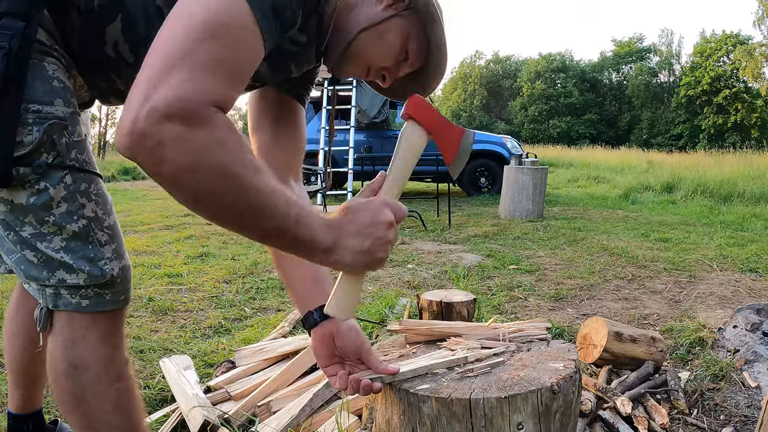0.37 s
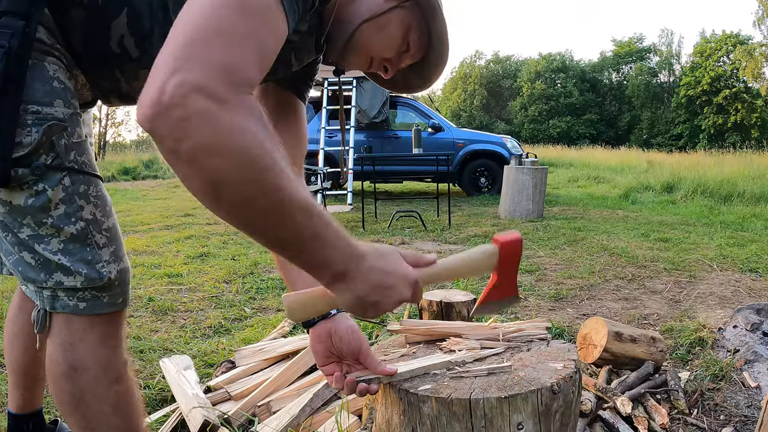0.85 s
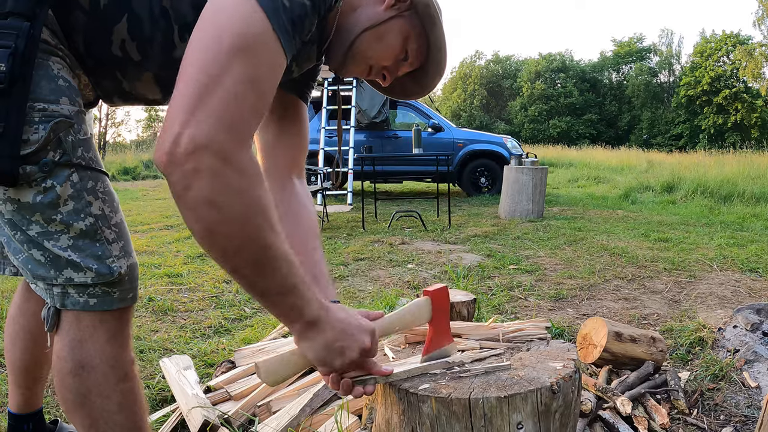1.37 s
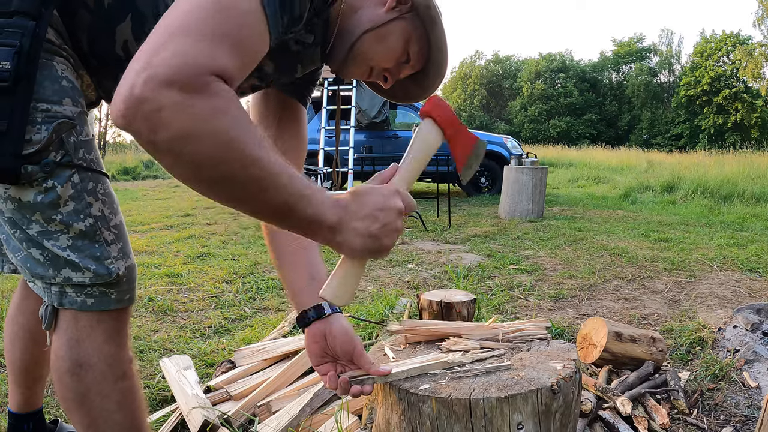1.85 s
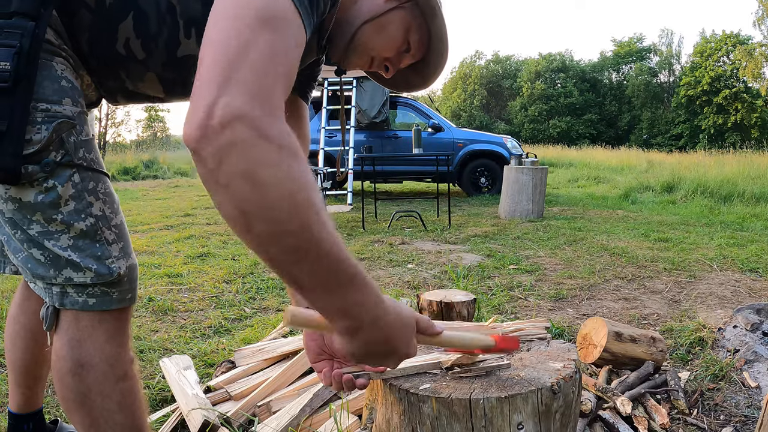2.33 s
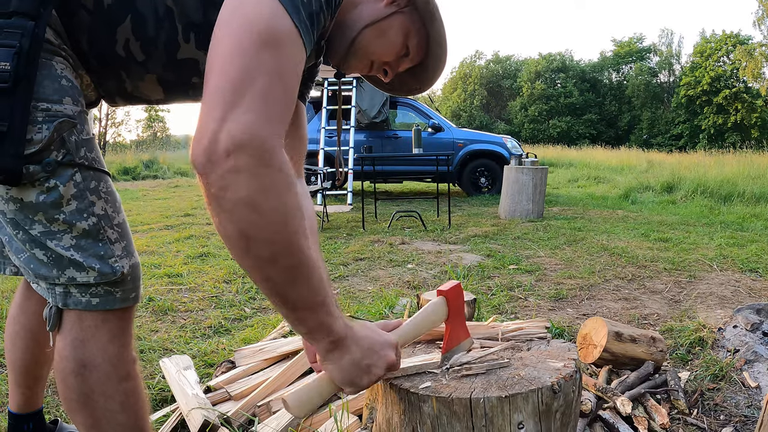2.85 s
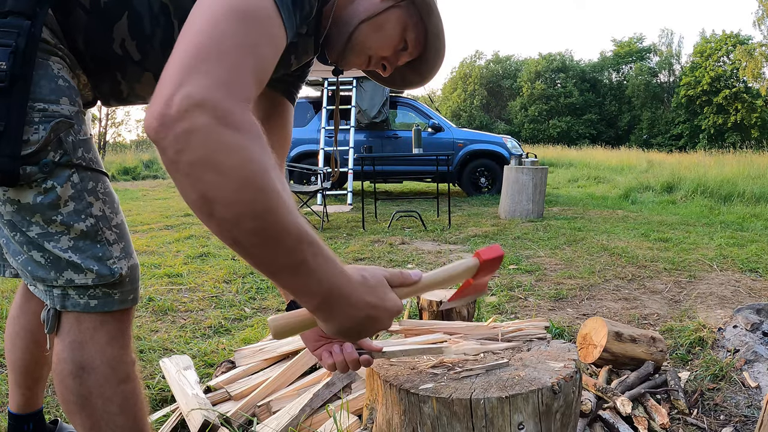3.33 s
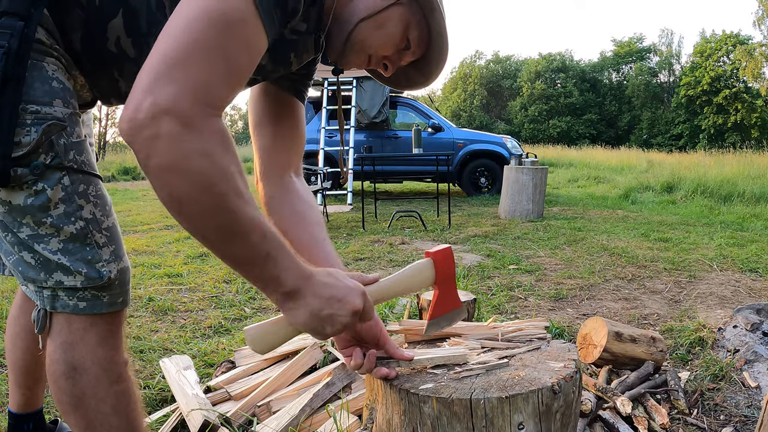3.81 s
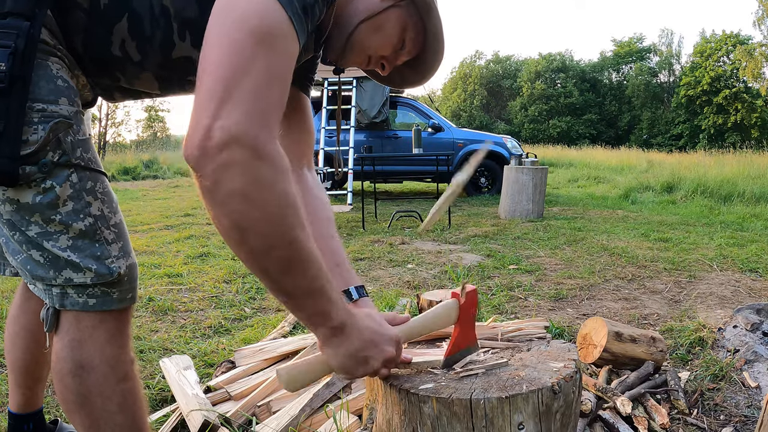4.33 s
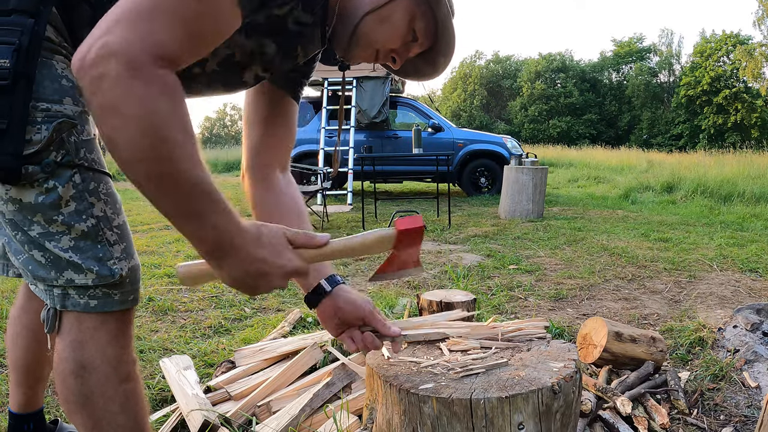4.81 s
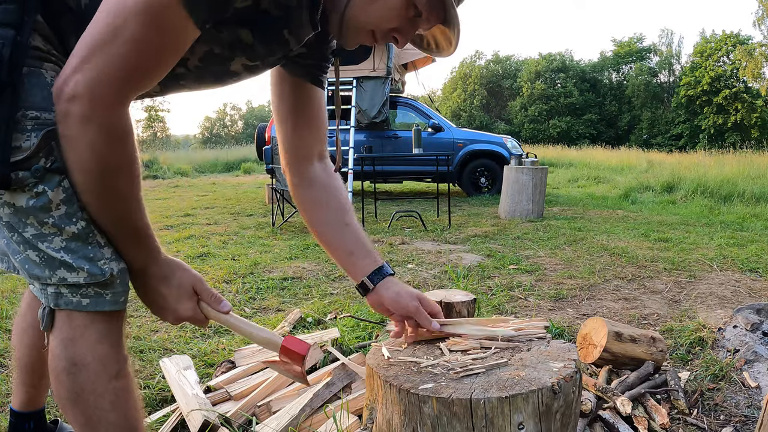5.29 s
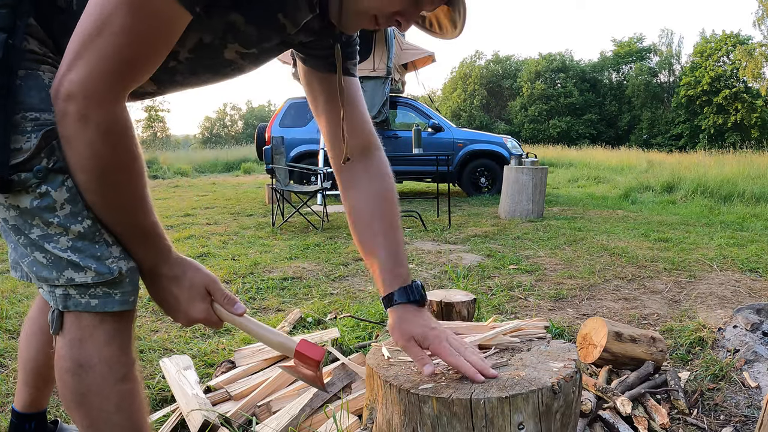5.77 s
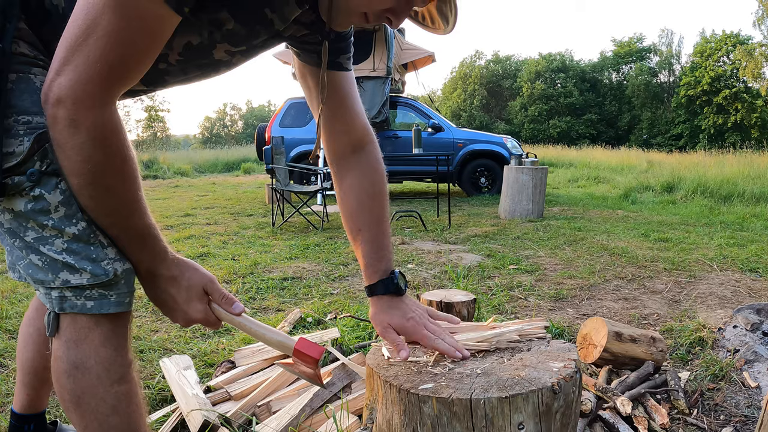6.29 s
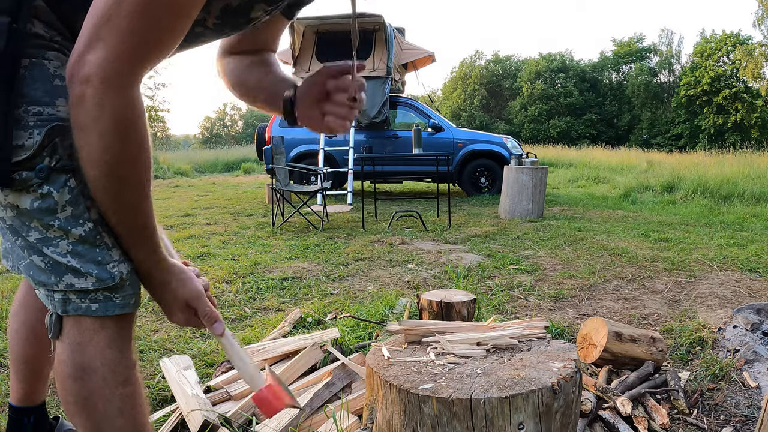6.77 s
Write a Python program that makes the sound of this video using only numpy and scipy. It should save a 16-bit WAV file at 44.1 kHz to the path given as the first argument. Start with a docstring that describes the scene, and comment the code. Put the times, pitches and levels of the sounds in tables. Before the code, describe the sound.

Five close, dry hatchet chops on a wooden block, loose wood clicking between them, followed by soft scraping of chips amid faint birdsong and breeze.

```python
"""A hatchet splits kindling on a stump in a meadow: noise snaps crack, decaying sines ring stump, soil and blade.
Sticks click and thump, grainy noise brushes and sweeps over chips, and short dull repeats trail the blows.
Birds whistle in gliding tones; shaped noise makes far leaves, wind at the microphone and a low late drone.
Two tracks of the same sound are mixed nearly 4 ms apart, which combs all but the dull repeats."""
import sys
import numpy as np
from scipy import signal
from scipy.fft import rfft, irfft, next_fast_len
from scipy.io import wavfile
from scipy.ndimage import uniform_filter1d, map_coordinates

SR = 44100
rng = np.random.default_rng(int(sys.argv[2]) if len(sys.argv) > 2 else 0)


def master_out(mix):
    """Clip the mix to full scale and print it as 16-bit PCM to the path in sys.argv[1]."""
    frames = np.transpose(np.atleast_2d(mix))
    ceiling = np.clip(frames, -1, 1)
    pcm = np.round(ceiling * 32767).astype(np.int16)
    wavfile.write(sys.argv[1], SR, pcm)


def boost_factor(decibels):
    """Convert a level in decibels to a linear amplitude factor."""
    exponent = np.asarray(decibels, float) / 20
    return 10 ** exponent


N = 314874  # length in samples

# Chops: start_s, crack_pitch_hz, stump_level_db, stump_pitch_hz, ground_level_db
CHOPS = [(0.5932, 1320, -15.5, 285, -34.5), (1.317, 1700, -22, 256, -32.5), (2.0994, 1450, -20, 267.6, -33),
         (2.9287, 3500, -19, 268.6, -30), (4.3139, 4000, -20.5, 239, -33.5)]
# Faint short cracks just before a chop: start_s, level_db
FORE_CRACKS = [(0.572, -34), (0.584, -28.5), (1.297, -41.5), (1.306, -30), (2.089, -35), (2.918, -31),
               (4.295, -40), (4.304, -30)]
# The shock of some chops, mainly on the right: start_s, level_db
JOLTS = [(1.317, -14), (2.9282, -18), (4.313, -7.5)]
# The freed blade sings: start_s, level_db, upper_modes_level_db
BLADE_RINGS = [(0.865, -63.5, -2), (1.607, -65, -2), (2.531, -69, -3.5)]
# Ringing modes of the hatchet head: pitch_hz, level_db, time_to_fall_60_db_s
STEEL_MODES = [(5250, -0.5, 1.2), (9815, 5, 0.35), (14180, -5, 0.22)]
# Ringing modes of the stump before they are shifted: pitch_hz, level_db, time_to_fall_60_db_s
STUMP_MODES = [(262.8, 2.5, 0.071), (183.4, 1, 0.077), (349.3, 1, 0.035), (555, -3.5, 0.02),
               (740, -10.5, 0.036), (1256, 0, 0.011)]
# Ringing modes of the soil under the stump: pitch_hz, level_db, time_to_fall_60_db_s
GROUND_MODES = [(34.3, -1.5, 0.2), (59, -4, 0.25), (85, 4.5, 0.13)]
# Tone of splitting fibres: frequency_hz, level_db
SNAP_TONE = [(300, -8.5), (1300, 2), (3400, 4.5), (6000, 0), (11000, 3.5), (15000, -18)]
# Sticks and blade knocking about: start_s, level_db, pitch_hz
CLACKS = [(0.803, -30.5, 3000), (0.863, -34, 5180), (0.894, -30, 5250), (1.007, -38.5, 5340),
          (1.406, -35.5, 3800), (1.555, -20.5, 3370), (1.607, -8, 2840), (1.659, -31.5, 591),
          (2.415, -21.5, 2000), (2.428, -40, 2970), (2.449, -33, 2620), (2.488, -25.5, 1900),
          (3.173, -37, 1840), (3.204, -15, 1990), (3.218, -23, 6500), (3.258, -22.5, 6900),
          (3.311, -36, 2290), (3.395, -33, 2470), (3.557, -35.5, 2270), (3.586, -29.5, 3340),
          (3.784, -32, 3800), (4.467, -40.5, 4550), (4.512, -38.5, 6070), (4.665, -38, 5000),
          (5.016, -43.5, 852), (5.064, -40.5, 2050), (5.445, -30.5, 1510), (5.457, -36, 600),
          (5.4755, -29, 1490), (5.488, -39.5, 628), (5.63, -36.5, 1630), (6.004, -41, 2340),
          (6.028, -34.5, 1730), (6.412, -26.5, 1286)]
# Soft weight landing on the stump: start_s, level_db, stump_pitch_hz
THUMPS = [(0.847, -49, 233), (2.412, -51.5, 262), (2.494, -28, 279), (3.211, -39, 254), (4.612, -42.5, 261)]
# The bare hand sweeps chips off the stump, a duller scrape: centre_s, half_length_s, level_db
SWEEPS = [(5.056, 0.048, -62.5), (5.47, 0.039, -60), (6.003, 0.074, -52.5), (6.415, 0.077, -59),
          (6.691, 0.27, -65), (7.023, 0.11, -55.5)]
# Blade and cloth brush over chips, a bright rustle: centre_s, half_length_s, level_db
BRUSHES = [(0.875, 0.027, -72), (1.515, 0.17, -75.5), (1.648, 0.022, -62.5), (2.42, 0.019, -54),
           (2.49, 0.019, -59.5), (2.65, 0.12, -77.5), (3.188, 0.034, -65), (3.433, 0.16, -76.5),
           (3.732, 0.16, -67.5), (4.005, 0.16, -73.5), (4.561, 0.11, -72)]
# Tone of fine grains of chips: frequency_hz, level_db
FINE_TONE = [(2500, -14), (5000, 1), (10000, 1), (15500, -17.5)]
# Tone of coarse grains of chips: frequency_hz, level_db
COARSE_TONE = [(350, -9.5), (800, -3.5), (1500, -0.5), (3500, -3), (7500, -12.5), (9000, -55)]
# Short dull repeats of the blows, up to 36 ms late: delay_s, level_db
DULL_REPEATS = [(0.017, -35), (0.0267, -19.5), (.036, -12)]
# How long the scattered tail lasts: frequency_hz, time_to_fall_60_db_s
MEADOW_DECAY = [(300, 0.29), (2000, 0.37), (7000, 0.63), (10000, 0.092)]
# Two-voiced bird, both falling: start_s, length_s, lower_first_pitch_hz, upper_first_pitch_hz, level_db
DUETS = [(1.447, 0.092, 6730, 7900, -66), (3.88, 0.16, 7210, 9210, -56), (4.104, 0.1, 6460, 8430, -55),
         (5.568, 0.13, 7330, 8670, -75), (5.757, 0.088, 6440, 7820, -72.5)]
# Calls that flick up, then droop: start_s, droop_length_s, top_pitch_hz, level_db
HOOKS = [(6.478, 0.13, 7550, -60.5), (6.67, 0.074, 7470, -55), (6.828, 0.058, 7330, -55.5)]
# Short rising cheeps: start_s, level_db
CHEEPS = [(.835, -65), (.93, -59.5), (1.13, -59), (3.935, -54), (4.215, -69)]
# Notes that rise and sink again: start_s, length_s, top_pitch_hz, level_db
ARCHES = [(1.738, 0.099, 6770, -69.5), (2.662, 0.13, 2860, -68.5), (3.308, 0.1, 2600, -69),
          (3.447, 0.098, 2820, -65.5), (4.464, 0.15, 5960, -74), (4.679, 0.089, 6040, -73.5)]
# Other whistled notes, straight glides: start_s, length_s, first_pitch_hz, last_pitch_hz, level_db
GLIDES = [(1.781, 0.064, 3990, 4640, -64), (1.923, 0.11, 6060, 6120, -73), (1.96, 0.14, 3040, 3760, -75),
          (2.591, 0.092, 2760, 2100, -68.5), (2.648, 0.073, 4180, 2780, -72),
          (2.819, 0.16, 2920, 3980, -69), (3.392, 0.059, 2540, 2100, -65), (3.46, 0.053, 3300, 3830, -75),
          (3.843, 0.061, 2150, 2800, -68), (3.904, .07, 2800, 2280, -65.5), (3.97, 0.13, 3070, 3720, -72),
          (4.282, 0.036, 7740, 8200, -56), (4.285, 0.018, 5780, 5900, -50.5),
          (4.882, 0.14, 2930, 3820, -73), (5.018, 0.13, 2110, 2080, -70.5), (5.344, 0.075, 1805, 1870, -71),
          (5.73, 0.28, 2620, 3450, -71), (5.818, 0.059, 3200, 3720, -70), (6.138, 0.11, 6480, 4360, -70.5),
          (6.265, 0.17, 2710, 2240, -65), (6.271, 0.046, 2800, 3050, -70), (6.459, 0.041, 5060, 5060, -62),
          (6.46, 0.13, 4000, 4020, -70), (6.519, 0.28, 3105, 3195, -70), (6.835, 0.083, 1636, 1568, -67.5),
          (7.004, 0.11, 3300, 3670, -58.5), (7.074, 0.058, 1567, 1530, -62)]
# The two pips in each beat of the twitter: delay_s, first_pitch_hz, last_pitch_hz, length_s, level_db
TWITTER_PIPS = [(0, 5220, 5000, 0.017, -58.5), (0.011, 3934, 2994, 0.0209, -57.5)]
# Strength of the wind at the microphone: time_s, level_db
WIND = [(0, -55.5), (.24, -53.5), (.28, -62), (.8, -69), (1.7, -73), (2.3, -66), (3.4, -72.5), (3.8, -66),
        (4.7, -77), (5.5, -60.5), (5.7, -68.5), (6.78, -67), (7.14, -62.5)]
# Tone of the low wind buffeting: frequency_hz, level_db
BUFFET_TONE = [(18, -12.5), (38, -1), (70, 3.5), (110, -13), (140, -24.5)]
# Tone of the higher wind flutter: frequency_hz, level_db
FLUTTER_TONE = [(110, 4.5), (170, 7), (230, 4), (320, -7), (450, -19.5), (700, -9)]
# Tone of the far leaves: frequency_hz, level_db
LEAVES_TONE = [(210, -31.5), (350, 0), (653, -12.5), (1040, 1.5), (1680, -3.5), (2100, -3.5), (2750, -5.5),
               (7080, -12.5), (8310, -17.5), (12400, -26), (15800, -39.5)]
# Tone of the low late drone: frequency_hz, level_db
DRONE_TONE = [(25, -9), (50, -12), (70, 1), (90, -1), (130, -31)]


def hatchet():
    """Each chop cracks the stick, rings the stump and thuds into the soil; the freed blade sings."""
    out = np.zeros((2, N))
    t = np.arange(2048) / SR
    for start, crack_hz, stump_db, stump_hz, ground_db in CHOPS:
        snap = crack(crack_hz, hold=0.002, t60=0.0041, body_db=-8.0, top_hz=15020, chirp=0.00057)
        add(out, start, boost_factor(-10.5) * snap)  # every chop cracks about as loud
        wood = ring(stump(stump_hz), rise=0.0055, spread_db=2.5)
        add(out, start, -boost_factor(stump_db) * wood * boost_factor([[-1.5], [1.5]]))  # stronger on the right
        add(out, start, boost_factor(ground_db) * ring(GROUND_MODES, rise=0.0036, spread_db=3.0))
    # the shock climbs the tripod
    jolt = np.sin(2 * np.pi * 120 * t) * (t / 0.002) * np.exp(1 - t / 0.0014)
    for start, db in JOLTS:
        add(out, start, boost_factor(db) * jolt * [[-0.15], [0.85]])
    for start, db in FORE_CRACKS:
        fore_crack = crack(2300, hold=0.0012, t60=0.026, body_db=-7.5, top_hz=4000, chirp=0.0011)
        add(out, start, boost_factor(db) * fore_crack)
    for start, db, upper_db in BLADE_RINGS:
        lowest = ring(STEEL_MODES[:1], rise=0.0022, spread_db=4.0)
        upper = ring(STEEL_MODES[1:], rise=0.0011, spread_db=3)
        add(out, start, boost_factor(db) * (lowest + boost_factor(upper_db) * upper))
    return out


def crack(hz, hold, t60, body_db, top_hz, chirp):
    """A snap of fibres, a splintering tail and a woody knock at hz and a little above; peak 1.
    Treble comes later, by chirp seconds for each e-fold of frequency."""
    t = np.arange(2048) / SR

    def fade(length):
        return boost_factor(-60 * np.maximum(t - hold, 0) / length) * np.minimum(t / 0.00019, 1)

    def fibres(f):
        return boost_factor(along(SNAP_TONE, f)) / (1 + (f / top_hz) ** 3)

    def delay_treble(f):
        return np.exp(-2j * np.pi * chirp * f * (np.log(f / 1100 + 1e-9) - 1))

    snap, splinter = rng.standard_normal(size=(2, 2, 2048))
    noise = snap * fade(t60) + boost_factor(-8.5) * splinter * fade(3.7 * t60)
    sound = pair(filtered(noise, fibres), side_db=-8.5)
    turns = 2 * np.pi * hz * t
    two_tones = np.sin(turns) + 0.5 * np.sin((1.1 + 0.3 * rng.random()) * turns)
    knock = np.exp(-0.04 * turns) * np.minimum(t / 0.0005, 1) * two_tones
    sound = sound / np.abs(sound).max() + boost_factor(body_db) * knock
    sound = filtered(np.pad(sound, ((0, 0), (64, 0))), delay_treble)[:, 40:]
    return sound / np.abs(sound).max()


def ring(modes, rise, spread_db):
    """Struck modes are decaying sines at new strengths each blow, cut off after half a second."""
    t = np.arange(SR // 2) / SR
    tones = 0
    for hz, db, t60 in modes:
        strength = db + rng.normal(0, spread_db)
        tones = tones + boost_factor(strength - 60 * t / t60) * np.sin(2 * np.pi * hz * t)
    return tones * (1 - np.exp(-(t / rise) ** 2))


def stump(hz):
    """The spot struck and the load set the stump's pitch: its modes shift so that the main one lies at hz."""
    return [(mode_hz * hz / STUMP_MODES[0][0], db, t60) for mode_hz, db, t60 in STUMP_MODES]


def sticks():
    """Light wood gives short clicks; a soft landing only thumps the stump."""
    out = np.zeros((2, N))
    for start, db, hz in CLACKS:
        woody_db, edge_hz = 17000 / (hz + 400) - 11, 3 * hz + 3500  # low knocks ring fuller and duller
        click = crack(hz, hold=0.0015, t60=0.0079, body_db=woody_db, top_hz=edge_hz, chirp=0.00047)
        add(out, start, boost_factor(db - 7.5) * click)
    for start, db, hz in THUMPS:
        add(out, start, boost_factor(db) * ring(stump(hz), rise=0.0018, spread_db=3.5))
    return out


def chips():
    """Each sweep of the hand knocks eight chips at random moments, as small woody cracks."""
    out = np.zeros((2, N))
    for centre, half, db in SWEEPS:
        for at, high, soft in rng.random(size=(8, 3)):
            hz = 1100 * 3 ** high
            tick = crack(hz, hold=0.0006, t60=0.0094, body_db=22, top_hz=5000, chirp=0)
            add(out, centre + half * 1.8 * (at - 0.5), boost_factor(db - 1 - 7.5 * soft) * tick)
    return out


def rustle():
    """Each stroke swells and fades as dense, clumped grains of dry chips."""
    t = np.arange(N) / SR

    def strokes(rows):
        return sum(boost_factor(db) * np.exp(-((t - centre) / half) ** 2) for centre, half, db in rows)

    def grains(depth_db):
        return rng.standard_normal((2, N)) * boost_factor(depth_db * wobble(500) + 1.4 * wobble(60))

    brush, sweep = strokes(BRUSHES), strokes(SWEEPS)
    fine_gain = boost_factor(5) * brush + boost_factor(-14) * sweep  # the hand raises few fine grains
    fine = fine_gain * pair(coloured(grains(4.6), FINE_TONE), side_db=-10.5)
    coarse = (brush + sweep) * pair(coloured(grains(3.8), COARSE_TONE), side_db=-45)
    return fine + coarse


def dull_repeats(x):
    """Short repeats are delayed copies, cut above 8 kHz and thin in the bass."""
    def taps(f):
        return sum(boost_factor(db) * np.exp(-2j * np.pi * f * delay) for delay, db in DULL_REPEATS)

    return filtered(x, lambda f: taps(f) * f / (f + 900) / (1 + (f / 7800) ** 24))


def birds():
    """Near calls of five kinds, each from its own side, an even twitter, and a faint far chorus."""
    out = np.zeros((2, N))

    def side():
        return boost_factor(rng.normal(0, 3.7) * np.array([[1], [-1]]))

    # notes: start_s, length_s, first_hz, middle_hz, last_hz, level_db
    notes = [(start, length, first, (first + last) / 2, last, db) for start, length, first, last, db in GLIDES]
    notes += [(start, length, 0.94 * top, top, 0.92 * top, db) for start, length, top, db in ARCHES]
    notes += [(start, 0.01, 3330, 3800, 4050, db) for start, db in CHEEPS]
    for start, length, low_hz, high_hz, db in DUETS:
        end = 1 - 1.4 * length  # share of the pitch left at the end
        sag = 0.972 ** (length / 0.15) ** 2  # long calls dip further below a straight fall
        for hz, level in ((low_hz, db), (high_hz, db - 2.5)):
            notes.append((start, length, hz, sag * hz * (1 + end) / 2, end * hz, level))
    flick_s = 0.022
    for start, length, top, db in HOOKS:
        notes.append((start, flick_s, 2100, 0.93 * top, top, db - 7))
        notes.append((start + flick_s, length, top, 0.985 * top, 0.91 * top, db))
    for start, length, first, middle, last, db in notes:
        add(out, start, boost_factor(db + 2.5) * whistle(length, first, middle, last) * side())

    for beat in 6.617 + 0.0632 * np.arange(7):  # start and spacing in seconds, seven beats
        for delay, first, last, length, db in TWITTER_PIPS:
            add(out, beat + delay, boost_factor(db) * whistle(length, first, (first + last) / 2, last))

    for at, high, long, rise, fall, loud in rng.random(size=(150, 6)):
        hz = 2000 * 2.2 ** high
        note = whistle(0.022 + 0.1 * long, hz, hz * (1.1 + 0.2 * rise), hz * (0.72 + 0.22 * fall))
        add(out, at * N / SR, boost_factor(-84 + 4 * loud) * note * side())
    return out


def whistle(length, first_hz, mid_hz, last_hz):
    """A gliding, slightly hoarse note: a sine of wavering phase and level with a weak octave."""
    u = np.linspace(0, 1, max(round(length * SR), 64))
    # a curve through the first, middle and last pitch
    hz = first_hz * (1 - u) * (1 - 2 * u) + 4 * mid_hz * u * (1 - u) + last_hz * u * (2 * u - 1)
    hoarseness = 0.5 * map_coordinates(rng.standard_normal(size=200), [u * length * 300])
    phase = 2 * np.pi * np.cumsum(hz) / SR + hoarseness
    swell = np.minimum(np.minimum(u, 1 - u) * length / 0.01, 1)
    swell = swell * boost_factor(3.5 * map_coordinates(rng.standard_normal(size=40), [u * length * 45]))
    return swell * (np.sin(phase) + boost_factor(-35.0) * np.sin(2 * phase))


def meadow(x):
    """A thin tail scattered by trees builds up as the far ones answer; each pitch dies at its own speed."""
    hz, t, z = signal.stft(rng.standard_normal((2, SR // 2)), SR, nperseg=256)
    t60 = np.interp(hz, *np.transpose(MEADOW_DECAY))[:, None]
    shape = boost_factor(-60 * t / t60) * np.minimum(t / 0.032, 1)
    tail = signal.istft(z * shape, SR, nperseg=256)[1]
    tail = tail / np.linalg.norm(tail[0])
    return pair(signal.fftconvolve(x, tail, axes=1)[:, :N], side_db=-3.0)


def air():
    """Shaped noise: leaves hiss in patches, wind buffets and flutters in lumps, a low drone swells late."""
    wind_db, = curves(WIND)
    t = np.arange(N) / SR

    def noise(spectrum):
        return coloured(rng.standard_normal((2, N)), spectrum)

    gust_db, lump_db, breath_db = 2.2 * wobble(7), 2.2 * wobble(12), 1.2 * wobble(3)
    leaves_db = -69.5 + breath_db - 3.1 * (t < 0.24)  # softer at the very start
    leaves = boost_factor(leaves_db) * pair(coloured(patchy(depth_db=1), LEAVES_TONE), side_db=-8.5)
    buffet = boost_factor(wind_db - 7.5 + gust_db) * pair(noise(BUFFET_TONE), side_db=-23)
    flutter = boost_factor(wind_db + lump_db) * pair(noise(FLUTTER_TONE), side_db=-9.5)
    drone_gain = boost_factor(-56.5 + 0.93 * wobble(6)) * np.exp(-((t - 6.41) / 0.69) ** 4)
    drone = drone_gain * pair(noise(DRONE_TONE), side_db=-47)
    # an airy hum near 1.2 kHz passes early on
    hum_gain = boost_factor(-69.0) * np.exp(-((t - 0.42) / 0.26) ** 2)
    hum = hum_gain * noise([(800, -14), (1200, -8.5), (1900, -32.5)])[0]
    return leaves + hum + buffet + drone + flutter


def patchy(depth_db):
    """Two noises whose level wanders in patches of time and pitch."""
    z = signal.stft(rng.standard_normal((2, N)), nperseg=512)[2]
    field = uniform_filter1d(rng.standard_normal(z.shape[1:]), size=8, axis=0)
    field = uniform_filter1d(field, size=20, axis=1)
    return signal.istft(z * boost_factor(depth_db * unit(field)), nperseg=512)[1][:, :N]


def unit(x):
    """Scales a signal to rms 1."""
    return x / np.sqrt(np.mean(x ** 2) + 1e-20)


def along(points, hz):
    """Reads (frequency, value) points on a log frequency axis, 30 lower beyond either end."""
    f, v = np.transpose(points)
    return np.interp(np.log(hz + 1), np.log(f + 1), v, left=v[0] - 30, right=v[-1] - 30)


def curves(rows):
    """One value per sample for each column after the time."""
    times, *columns = np.transpose(rows)
    return [np.interp(np.arange(N) / SR, times, column) for column in columns]


def wobble(rate):
    """A smooth random curve with rate random points a second."""
    return map_coordinates(rng.standard_normal(int(N * rate / SR) + 4), [np.arange(N) * rate / SR])


def filtered(x, response):
    """Multiplies the spectrum of x by a response, a function of frequency in Hz."""
    n = x.shape[-1]
    m = next_fast_len(n + 8192)
    return irfft(rfft(x, m) * response(np.fft.rfftfreq(m, 1 / SR)), m)[..., :n]


def coloured(x, spectrum):
    """Gives x the tone of a spectrum table, at rms 1."""
    return unit(filtered(x, lambda hz: boost_factor(along(spectrum, hz))))


def pair(x, side_db):
    """Turns two signals into the middle and side of a stereo pair."""
    side = boost_factor(side_db) * x[1]
    return np.array([x[0] + side, x[0] - side])


def add(track, start, sound):
    """Mixes a sound into the track at a start in seconds."""
    at = track[..., round(start * SR):][..., :sound.shape[-1]]
    at += sound[..., :at.shape[-1]]


def doubled(x):
    """A mono track, duller above 8 kHz, comes first; the stereo track follows and combs with it."""
    lag = 166.4  # samples
    late = filtered(x, lambda f: np.exp(-2j * np.pi * f * lag / SR))
    early = filtered(x.mean(0), lambda f: boost_factor(3.5 - 9 / (1 + (7800 / (f + 1)) ** 30)))
    return early + late


def scene():
    """Near blows with their dull repeats, over birds, rustle and air."""
    blows = hatchet() + sticks() + chips()
    song = birds()
    far = boost_factor(-30.0) * meadow(blows) + boost_factor(-17.0) * meadow(song)
    return doubled(blows + song + far + rustle() + air()) + dull_repeats(blows.mean(0))


def roll_off(x):
    """The treble ends steeply here."""
    return signal.sosfilt(signal.butter(12, 16640, fs=SR, output="sos"), x)


def record(dry):
    """The treble fades out steeply above about 15 kHz."""
    dull = filtered(dry, lambda f: 1 / (1 + (f / 15900) ** 24))
    return roll_off(dull)


dry = scene()
out = record(dry)
master_out(out)
```